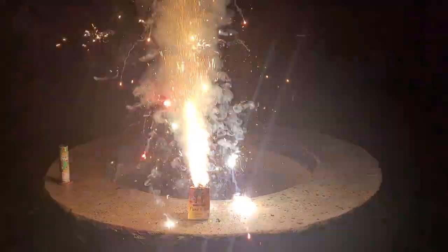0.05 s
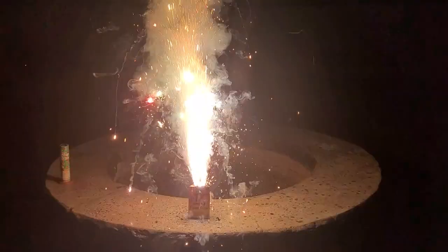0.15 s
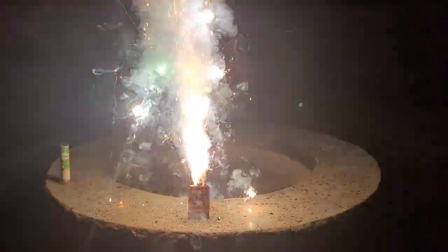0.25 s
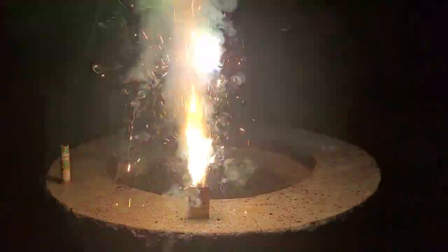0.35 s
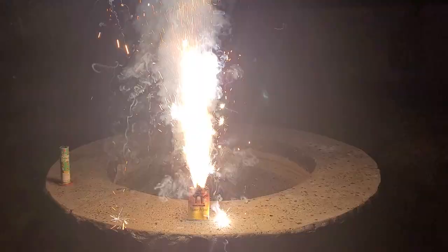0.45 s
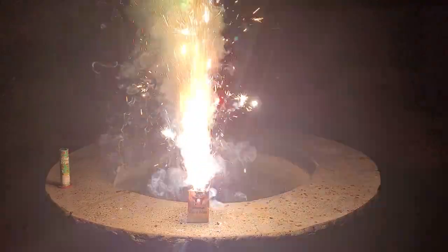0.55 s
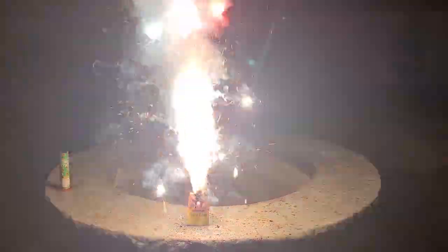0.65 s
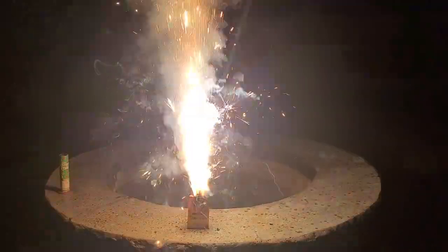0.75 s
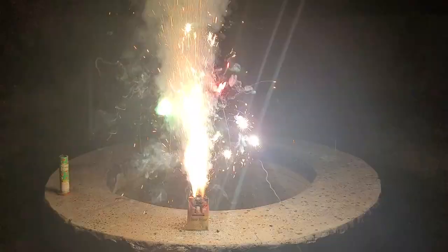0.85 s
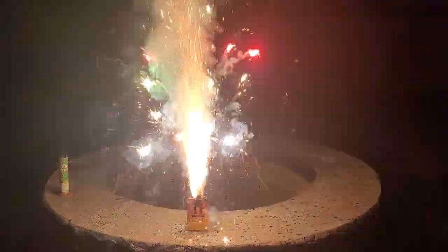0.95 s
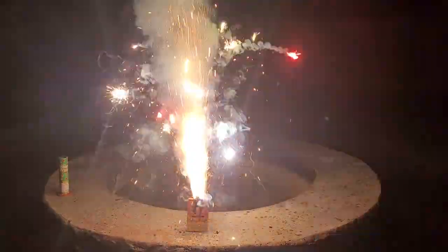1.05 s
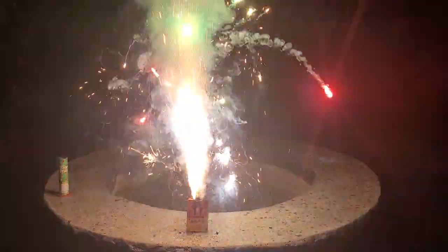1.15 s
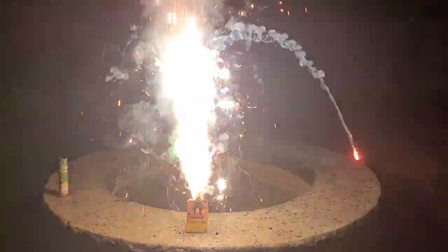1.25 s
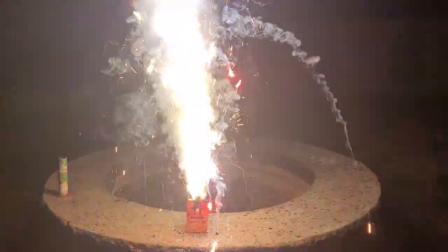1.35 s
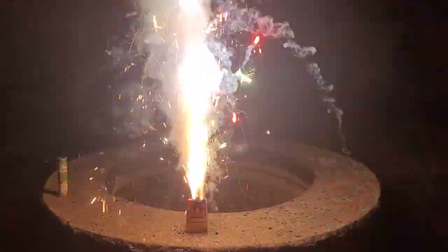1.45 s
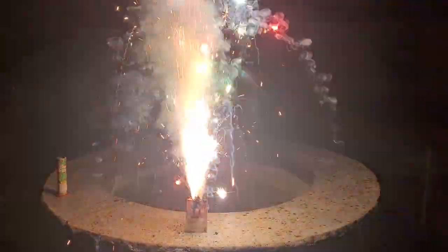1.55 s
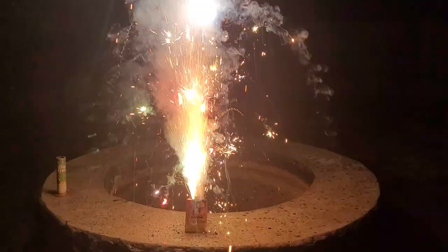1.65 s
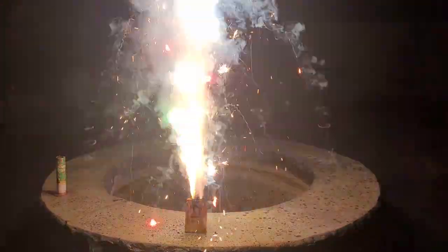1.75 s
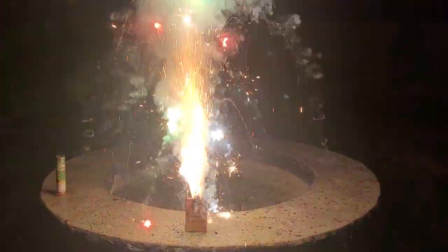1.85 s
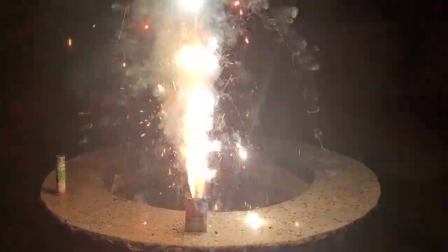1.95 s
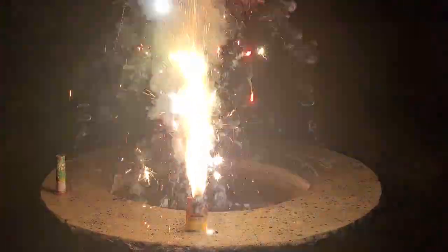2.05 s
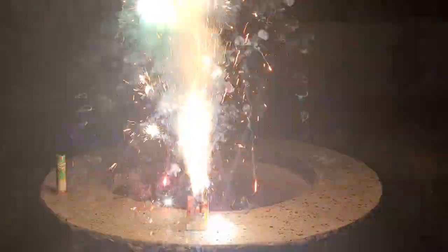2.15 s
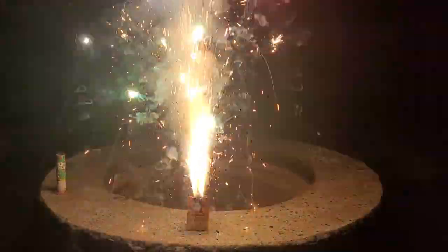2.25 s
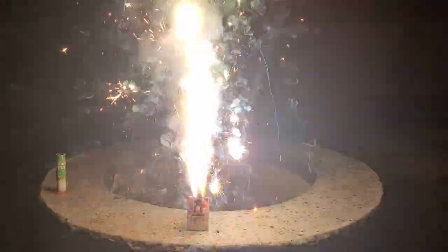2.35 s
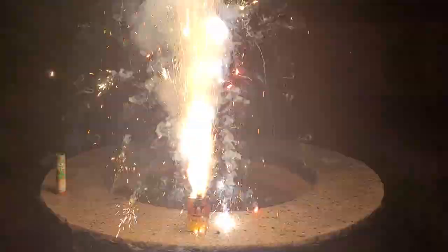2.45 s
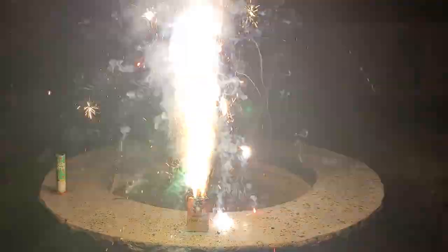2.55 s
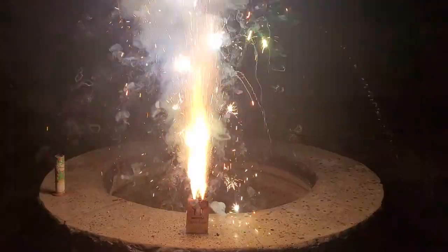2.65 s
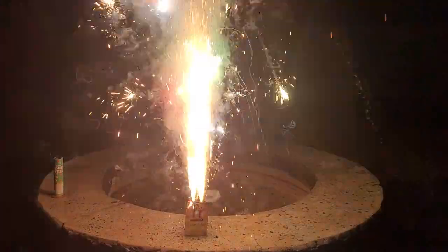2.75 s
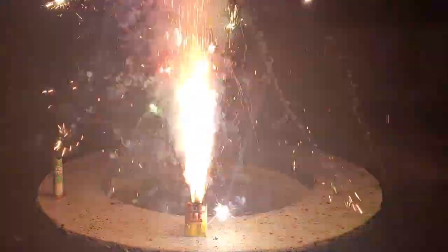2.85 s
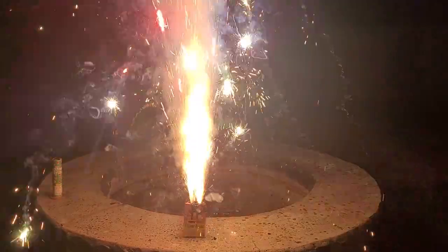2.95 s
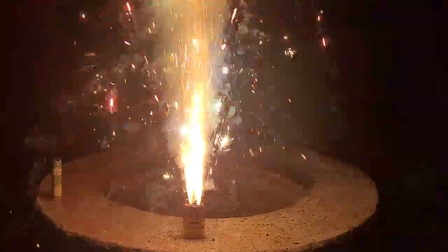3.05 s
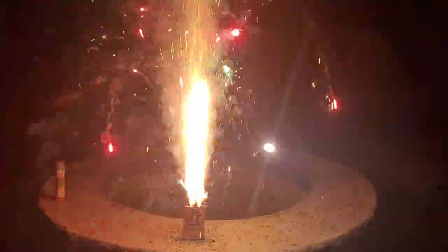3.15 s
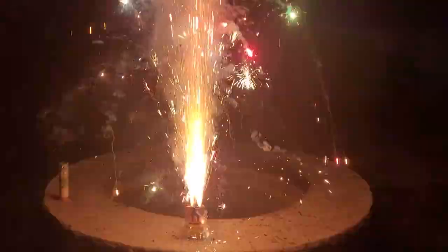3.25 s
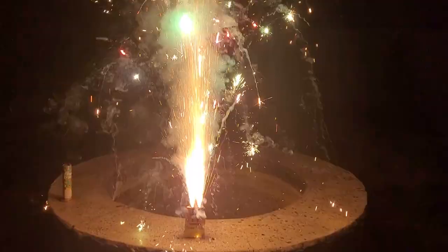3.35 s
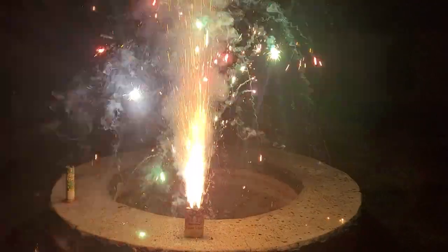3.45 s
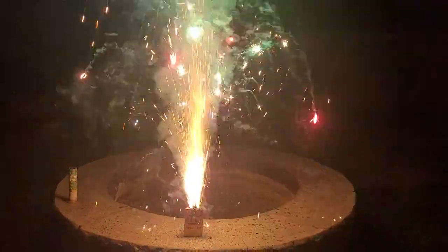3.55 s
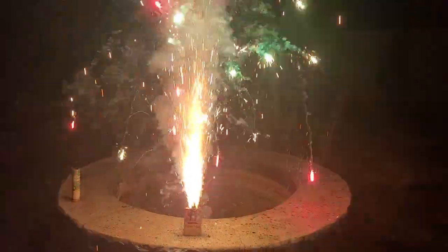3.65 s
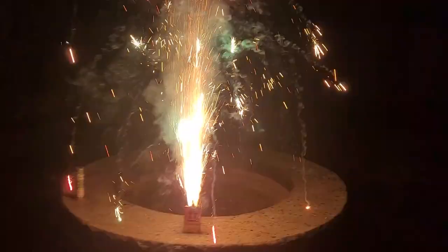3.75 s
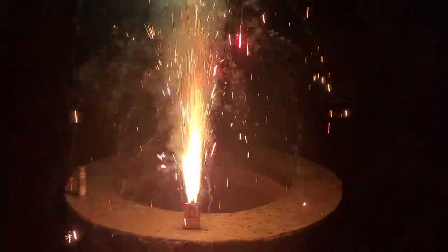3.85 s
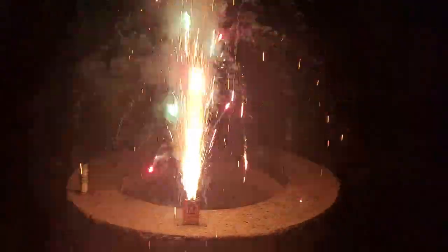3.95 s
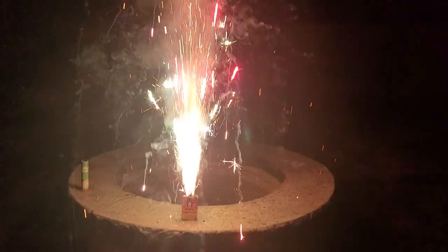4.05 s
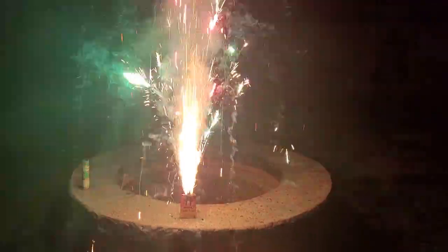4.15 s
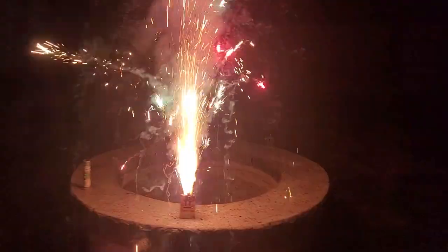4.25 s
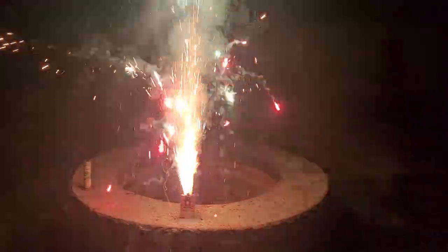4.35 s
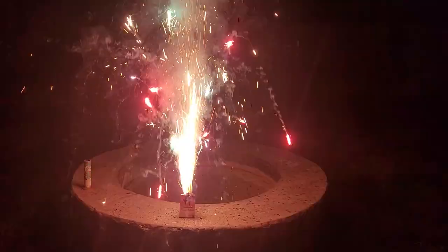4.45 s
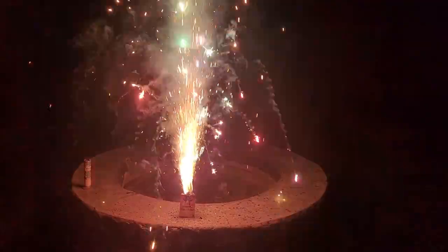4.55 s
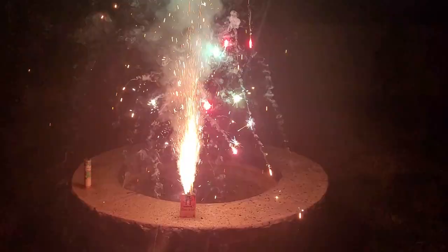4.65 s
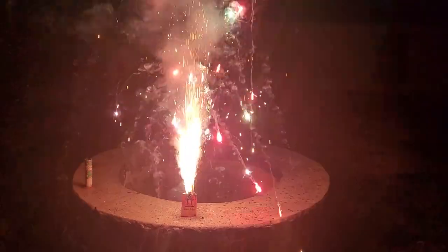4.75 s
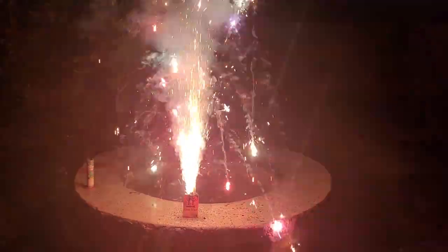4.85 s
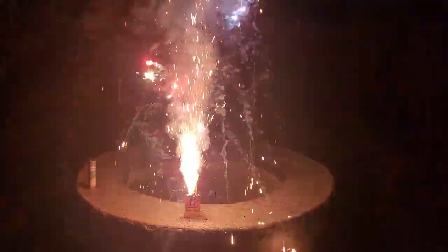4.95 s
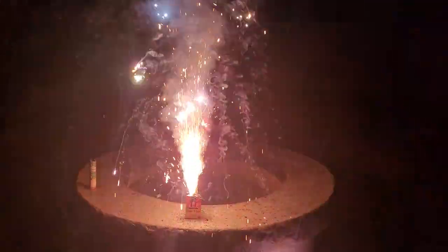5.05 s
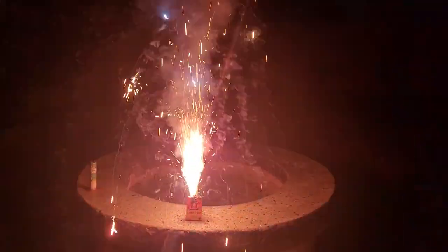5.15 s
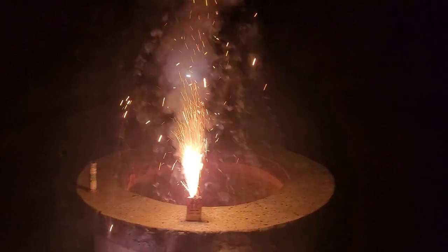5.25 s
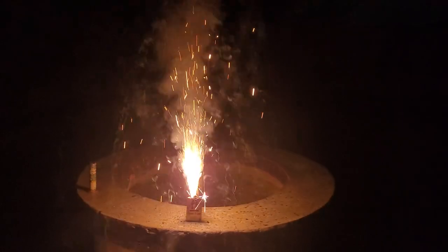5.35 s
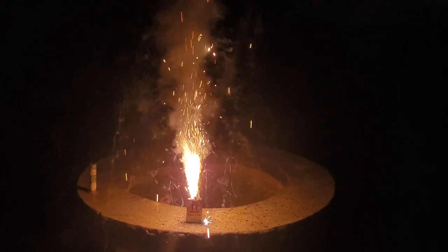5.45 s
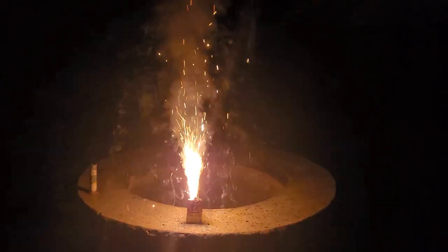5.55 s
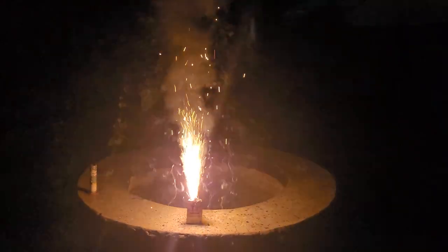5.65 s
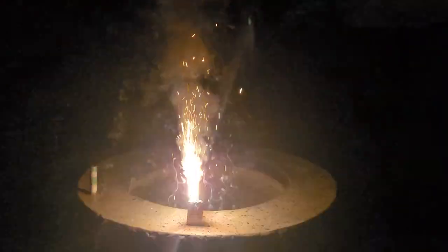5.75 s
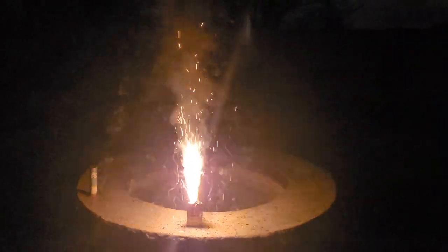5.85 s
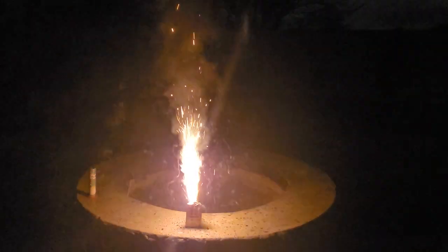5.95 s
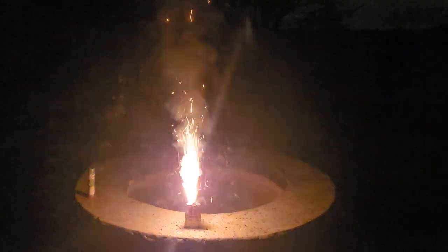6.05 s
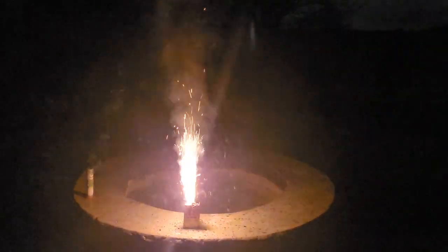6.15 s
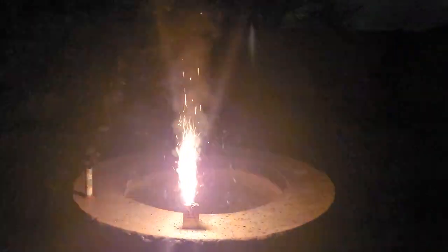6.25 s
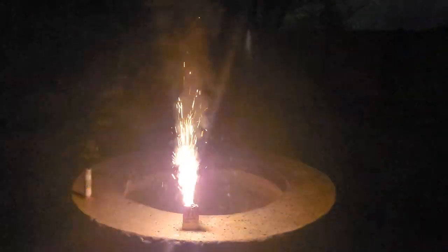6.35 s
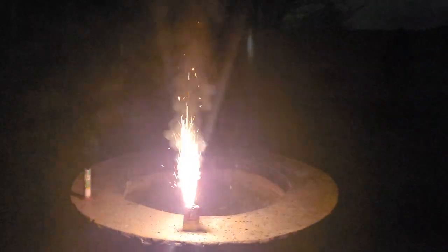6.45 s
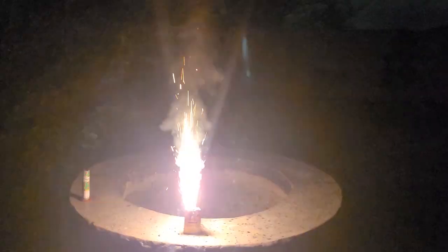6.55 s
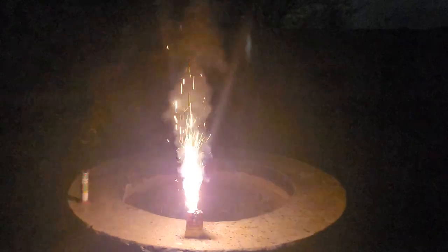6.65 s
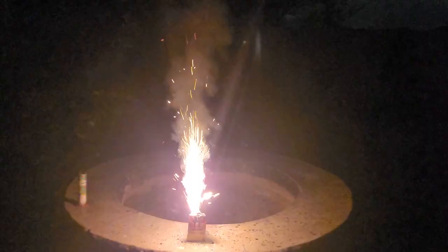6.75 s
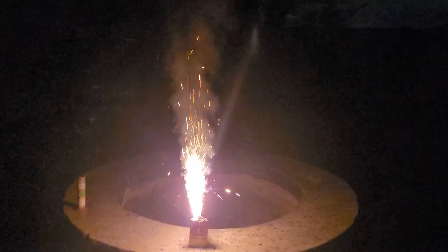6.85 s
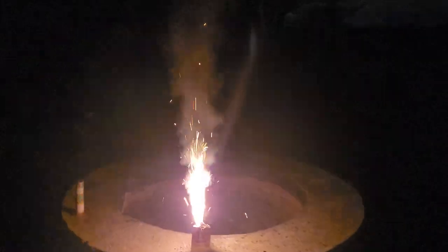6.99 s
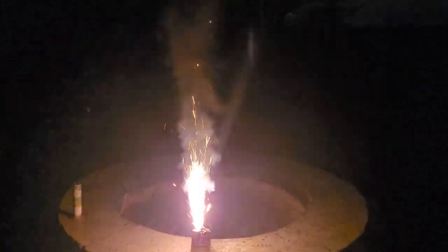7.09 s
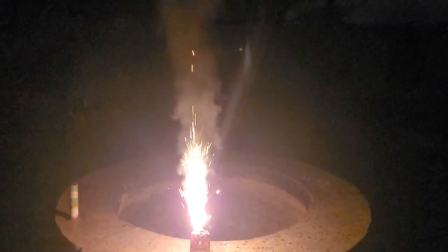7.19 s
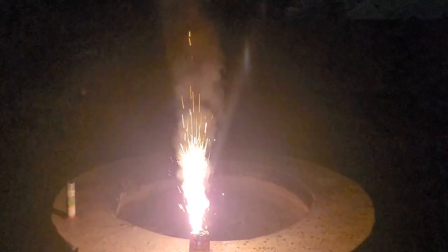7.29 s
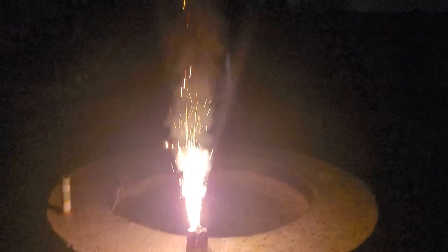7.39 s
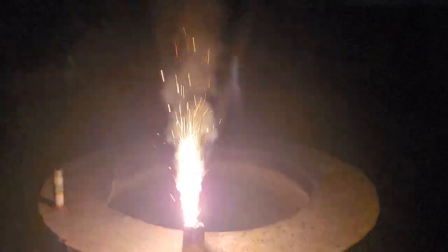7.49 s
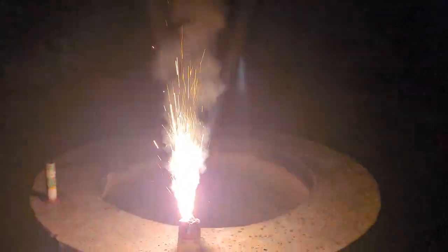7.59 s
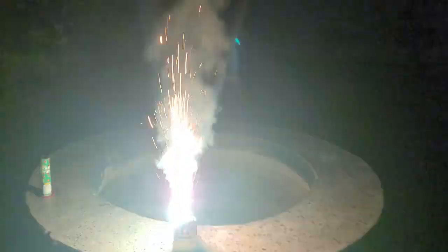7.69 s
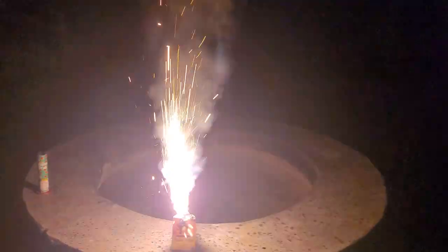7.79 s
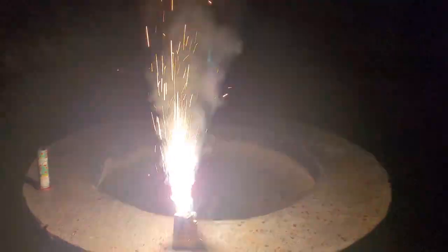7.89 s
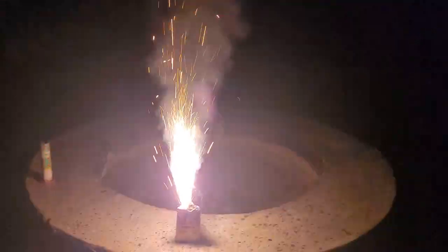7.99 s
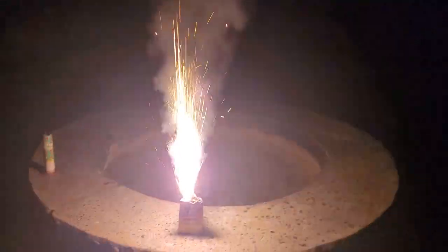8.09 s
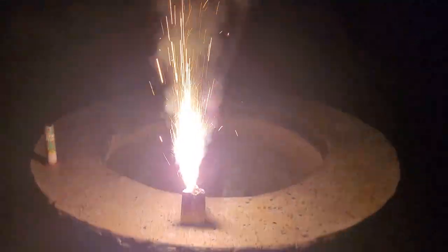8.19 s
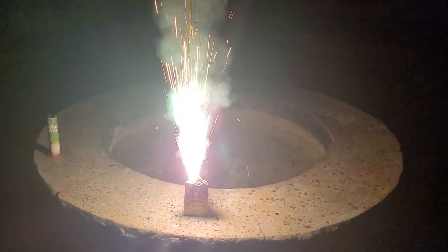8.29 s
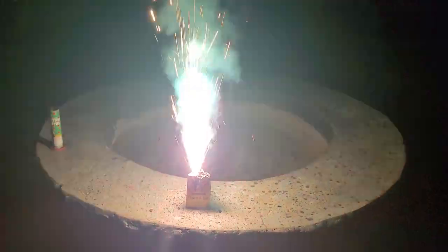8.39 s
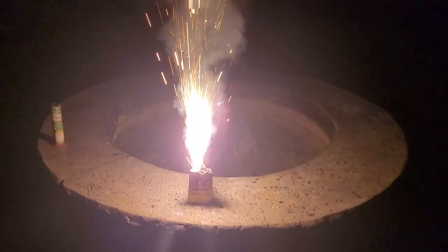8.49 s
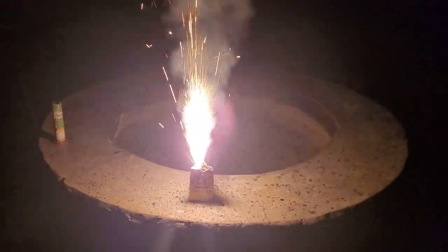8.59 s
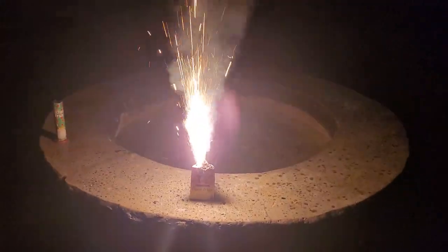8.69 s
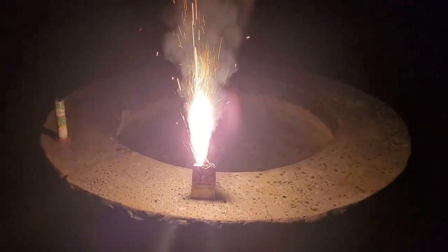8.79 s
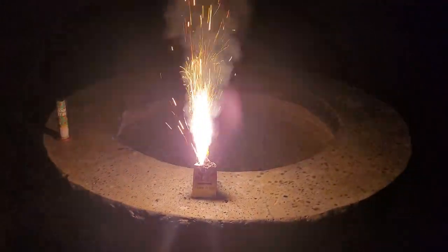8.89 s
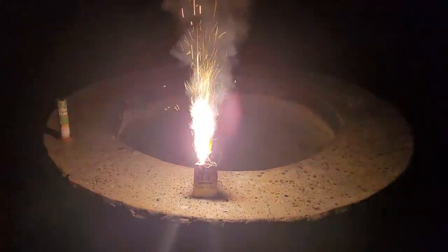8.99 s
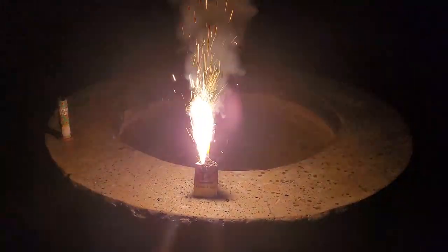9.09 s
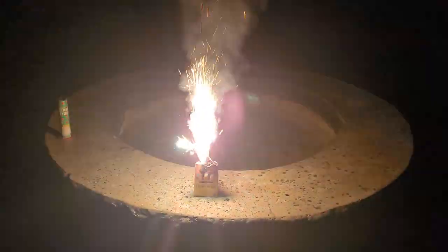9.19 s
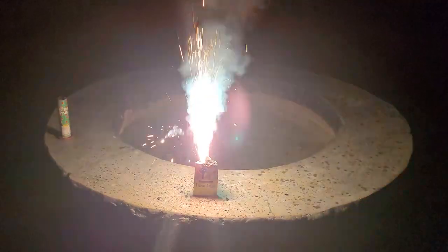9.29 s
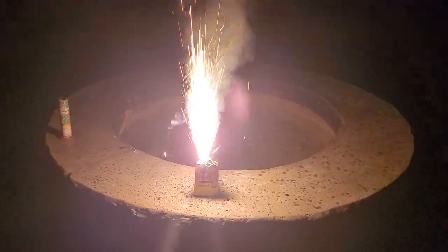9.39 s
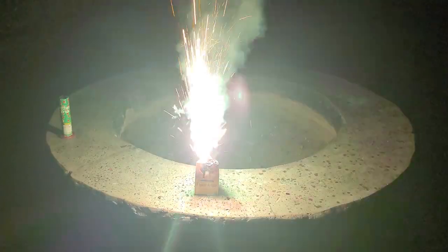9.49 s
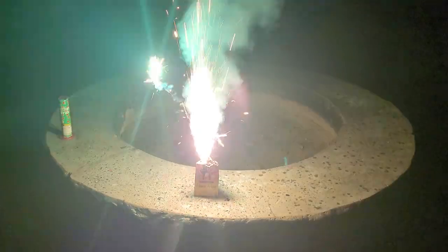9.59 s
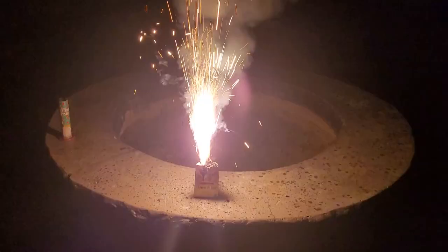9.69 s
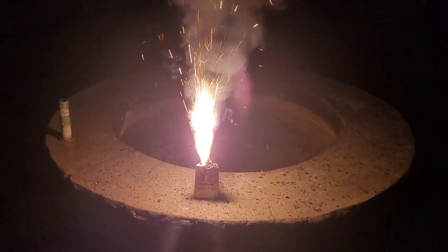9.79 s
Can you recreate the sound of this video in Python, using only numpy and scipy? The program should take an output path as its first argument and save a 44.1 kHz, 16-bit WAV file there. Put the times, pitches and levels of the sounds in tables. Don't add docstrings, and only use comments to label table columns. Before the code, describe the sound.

Gusty rushing gas and thick, fizzing crackle from a firework fountain, loud at first, then dropping away to a sputtering hiss with sparse ticks.

```python
import sys
import numpy as np
from scipy import signal
from scipy.fft import rfft, irfft, next_fast_len
from scipy.io import wavfile

SR = 44100
rng = np.random.default_rng(int(sys.argv[2]) if len(sys.argv) > 2 else 0)


def gain_from_db(level_db):
    decades = np.asarray(level_db, float) / 20
    return 10 ** decades


def generate_wav(sig):
    pcm = np.round(np.clip(np.atleast_2d(sig).T, -1, 1) * 32767).astype(np.int16)
    wavfile.write(sys.argv[1], SR, pcm)


N = 433491
TAPS = 4096
PORT_DELAY = 64


def evened(x):
    return x / np.sqrt(np.mean(x ** 2) + 1e-20)


def read(points, hz):
    f, value = np.transpose(points)
    return np.interp(np.log(hz + 1), np.log(f + 1), value)


def curve(rows, column):
    return np.interp(np.arange(N) / SR, np.transpose(rows)[0], np.transpose(rows)[column])


def surges(rows):
    t = np.arange(0, N + 64, 64) / SR
    centre, db, half = np.transpose(rows)[:, :, None]
    total_db = (db * np.exp(-((t - centre) / half) ** 2)).sum(axis=0)
    return np.interp(np.arange(N) / SR, t, total_db)


def gusts(low_hz, high_hz):
    size = N // 16 + 2
    hz = np.fft.rfftfreq(size, 16 / SR)
    shape = hz / (hz + low_hz) / np.sqrt(hz + low_hz) / (1 + (hz / high_hz) ** 2)
    slow = irfft(rfft(rng.standard_normal(size)) * shape, size)
    return evened(np.interp(np.arange(N) / 16, np.arange(len(slow)), slow))


# f/Hz, lead/rad
PORT_LEAD = [(0, 0), (1030, -.3), (2070, .6), (3100, 2.6), (3500, 4.7), (4800, 6.3), (5900, 6.7), (7450, 9),
             (7950, 6.9), (8900, 6.7), (11250, 9.4), (11900, 11.9), (13000, 13.3), (15600, 15.8)]


def ports(left, right, low_cut_hz, lag_s=0.):
    hz = np.fft.rfftfreq(TAPS, 1 / SR)
    gain = gain_from_db(np.maximum(read(left, hz), -100)) / np.sqrt(1 + (low_cut_hz / (hz + 1)) ** 4)
    log_gain = np.log(np.r_[gain, gain[-2:0:-1]])
    phase = signal.hilbert(log_gain).imag[:len(hz)]
    causal = gain * np.exp(-1j * phase - 2j * np.pi * hz * PORT_DELAY / SR)
    turn = np.exp(-1j * read(PORT_LEAD, hz) - 2j * np.pi * hz * lag_s)
    return np.array([causal, causal * turn * gain_from_db(read(right, hz) - read(left, hz))])


def heard(x, response):
    taps = irfft(np.atleast_2d(response), TAPS)
    return signal.oaconvolve(np.atleast_2d(x), taps, axes=1)[:, PORT_DELAY:N + PORT_DELAY]


def shaped(x, bands):
    size = next_fast_len(N)
    hz, z, out = np.fft.rfftfreq(size, 1 / SR), rfft(x, size), 0
    for from_hz, to_hz, low_hz, high_hz, level in bands:
        part = 1 / (1 + (from_hz / (hz + 1)) ** 8) - 1 / (1 + (to_hz / (hz + 1)) ** 8)
        inside = (hz > low_hz) & (hz < high_hz)
        core = np.sqrt(2 * np.sum(abs(z.mean(0)[inside]) ** 2) / size / N)
        out = out + irfft(z * part, size)[:, :N] * level / core
    return out


def dip(x, hz, width_hz, depth):
    turn, r = np.exp(2j * np.pi * np.cumsum(hz) / SR), np.exp(-np.pi * width_hz / SR)
    return x - depth * 2 * (turn * signal.lfilter([1 - r], [1, -r], x / turn)).real


# t/s, ground delay/ms, ground share, rim delay/ms, rim share
STONE_ECHOES = [
    (0, 2.37, 0.34, 3.73, -0.035),
    (3, 2.32, 0.34, 3.38, -0.092),
    (3.6, 2.38, 0.52, 2.4, -.2),
    (4.2, 2.1, 0.72, 2.55, -0.39),
    (6, 2.14, 0.45, 2.7, -0.13),
    (6.7, 2.2, 0.38, 2.7, -0.15),
    (7.1, 2.36, 0.34, 2.08, 0.19),
    (7.5, 2.2, 0.18, 2.53, 0.22),
    (8, 2.08, 0.16, 2.7, 0.13),
    (9.83, 2.06, 0.3, 3.1, 0.11),
]


def echoed(x, earlier_ms):
    n = np.arange(N)
    dull = signal.lfilter(*signal.butter(1, [250, 5000], "bandpass", fs=SR), x)
    ground = np.interp(n - (curve(STONE_ECHOES, 1) - earlier_ms) * SR / 1000, n, dull)
    rim = np.interp(n - (curve(STONE_ECHOES, 3) - earlier_ms) * SR / 1000, n, dull)
    return x + curve(STONE_ECHOES, 2) * ground + curve(STONE_ECHOES, 4) * rim


# t/s, level/dB, weight of coarse sparks/dB
SPARK_LOAD = [(0, -36.5, 0.5), (.25, -39, 0.5), (1.1, -38.5, -1.5), (2.2, -34.5, -1), (2.7, -37, 2.5),
              (3.4, -40, 4.5), (3.8, -40.5, -0.5), (4.6, -43.5, 0.5), (5.15, -47.5, -3), (5.5, -62, -4),
              (6, -73, 0), (9.83, -75, -2)]
# t/s, level/dB, half length/s
FLARES = [(0, 4, 0.034), (.13, 4.5, 0.032), (.53, 2, 0.11), (.71, 3, .04), (.94, 3.5, .05),
          (1.13, 3.5, 0.03), (1.31, 3.5, 0.072), (1.45, 3, 0.03), (1.62, 2, 0.052), (9.29, 3.5, 0.029),
          (2.16, 3, 0.036), (2.43, 2.5, 0.072), (2.62, 0.5, 0.034), (2.76, 4, 0.026), (2.96, 3, 0.11),
          (3.28, 2.5, 0.079), (3.89, -3.5, 0.086), (4.96, 1.5, 0.1), (5.125, 3, 0.02), (7.32, 7, .022),
          (6.81, 1.5, 0.06), (7.0, 2.5, .06), (7.23, 4.5, 0.058), (8.35, 5, 0.033), (8.43, 7, .025),
          (8.485, 1, 0.02), (9.2, 6.5, .028), (9.43, 5, .025), (9.53, 8, 0.04), (9.66, 6, 0.071)]


def cloud_db():
    load, flare = curve(SPARK_LOAD, 1), surges(FLARES)
    return load + curve(SPARK_LOAD, 2) + 0.78 * flare, load + flare


# t/s, roar level/dB
BURN = [(0, -30.5), (.3, -31.5), (1.1, -36), (1.8, -35.5), (2.35, -33), (2.9, -29), (3.45, -29.5),
        (3.85, -35.5), (4.55, -40.5), (5.12, -38), (5.5, -47.5), (6.1, -47), (6.75, -40), (7.1, -47.5),
        (7.75, -34), (8.7, -34), (9.0, -41.5), (9.83, -38.5)]
# t/s, level/dB, half length/s
PUFFS = [(.08, 3.5, 0.069), (.52, 1.5, 0.05), (.7, 3, 0.024), (.9, 1.5, 0.055), (1.31, 6, 0.1),
         (1.61, 4, .07), (1.95, 1.5, 0.07), (2.14, 2.5, 0.091), (2.5, 2, .08), (2.93, 0.5, .06),
         (3.37, 2.5, 0.057), (4.3, 3, 0.057), (4.84, 3.5, 0.15), (5.09, 2.5, .03), (5.97, 2.5, .04),
         (6.52, 1.5, 0.061), (6.62, 4, 0.024), (7.24, 3.5, 0.14), (7.38, 1.5, 0.042), (7.63, 3, 0.026),
         (8.05, -2.5, 0.029), (8.14, 4.5, 0.044), (8.24, 6.5, 0.02), (8.41, 3, 0.059), (8.68, 4.5, 0.016),
         (8.87, 4.5, 0.03), (9.09, 2, 0.064), (9.28, 6, 0.033), (9.47, 9.5, 0.12), (9.66, 8, 0.072)]
# t/s, gain
MOUTH_RING = [
    (0, 0),
    (5.1, 0.),
    (5.5, 1.5),
    (7.3, 0.99),
    (7.7, 0.17),
    (9.83, 0),
]
# f/Hz, level/dB per Hz
JET_LEFT = [(40, -1), (215, -10), (255, 2.5), (540, -7.5), (640, -10), (1900, -13.5), (2600, -21),
            (4200, -20.5), (5300, -18.5), (6200, -23.5), (7300, -18), (8600, -29), (10300, -23),
            (15600, -22.5)]
JET_RIGHT = [(40, 2), (215, -11.5), (255, 3.5), (540, -5.5), (640, -9.5), (1900, -6), (2600, -17),
             (3400, -35), (4800, -12.5), (6500, -12.5), (8600, -24), (10300, -17), (13000, -15.5),
             (15600, -14)]
# f/Hz, likeness 0-1
JET_LIKENESS = [(60, 0.94), (450, 1), (1200, 0.75), (2200, 0.93), (3400, 0.3), (4500, 0.98), (7300, 0.66),
                (7800, 0.4), (8600, 0.45), (11200, 0.8), (15000, 0.87)]
# t/s, first dip f/Hz, second dip f/Hz
HAND_DIPS = [
    (0, 7740, 10900),
    (5.5, 8150, 12100),
    (6.5, 7800, 11400),
    (7.5, 7900, 11400),
    (8.1, 8200, 11600),
    (8.5, 7950, 11600),
    (9.83, 7700, 10800),
]


def jet():
    flutter, spit = gusts(1.2, 46), gusts(3.9, 330)
    gas, stray = rng.standard_normal((2, N)) * gain_from_db(1.0 * flutter)
    hz = np.fft.rfftfreq(TAPS, 1 / SR)
    response = ports(JET_LEFT, JET_RIGHT, 49)
    same = np.clip(read(JET_LIKENESS, hz), 0, 1)
    mouth = 1 / (1 + ((hz - 5800) / 500) ** 2)

    left = heard(echoed(gas, 0.0049), response[0])
    left = left + curve(MOUTH_RING, 1) * heard(gas, response[0] * mouth)
    right = heard(echoed(gas, 0.15), response[1] * same)
    right = right + heard(stray, response[1] * np.sqrt(1 - same ** 2))
    right = dip(right[0], curve(HAND_DIPS, 1), 900, .6)
    right = dip(right, curve(HAND_DIPS, 2), 1000, .56)

    burn, puff, flare = curve(BURN, 1), surges(PUFFS), surges(FLARES)
    roar_db = burn + puff
    thrum_db = roar_db - 2.5 - 13.5 * curve(STONE_ECHOES, 2)
    hiss_db = -50.5 + 0.83 * (burn + 40) + 0.93 * puff + 0.26 * flare
    fizz_db = -46.5 + 0.44 * (burn + 40) + .15 * puff + flare
    stream_db = np.array(cloud_db()) - 2.5
    hiss, fizz = np.hypot(gain_from_db([hiss_db, fizz_db]), gain_from_db(stream_db))
    top_db = 2.3 * spit - 1.5 + .6 * flare + 0.16 * (burn + 40)
    return shaped(np.vstack([left, right]), [
        (0, 130.5, 46, 142, gain_from_db(roar_db - 13.0)),
        (130.0, 314, 51, 296, gain_from_db(thrum_db)),
        (327, 3290, 93, 4800, gain_from_db(roar_db)),
        (2550, 8740, 4080, 7600, hiss * gain_from_db(1.2 * spit)),
        (8470, 12600, 8100, 18000, fizz * gain_from_db(2.2 * spit)),
        (13800, 30000, 8100, 15400, fizz * gain_from_db(top_db))])


# f/Hz, level/dB per Hz
SPARK_LEFT = [(40, -21), (650, -21), (1900, -14.5), (2600, -8.5), (3500, -7.5), (4800, -10), (7300, -6.5),
              (8600, -14), (10300, -10.8), (13000, -11), (15500, -8.5)]
SPARK_RIGHT = [(40, -20.5), (650, -20), (1900, -7.5), (2600, -7.5), (3500, -19), (4800, -7), (7300, -3),
               (8600, -13), (10300, -14), (13000, -6.5), (15500, -3)]


def cloud():
    chance = 9000 * gain_from_db(2.2 * gusts(8, 150)) / SR
    fizz = gain_from_db(2.11 * rng.exponential(1, N)) * (rng.random(N) < chance) * rng.choice([-1, 1], N)
    snap_db = 13 + 2.5 * np.minimum(rng.exponential(1, N), 2.5)
    snaps = -gain_from_db(snap_db) * (rng.random(N) < .02 * chance)
    side, out = rng.integers(0, 8, N), 0
    for k, place in enumerate(np.linspace(-1, 1, num=8)):
        tilt = gain_from_db([[-3 * place], [3 * place]])
        response = ports(SPARK_LEFT, SPARK_RIGHT, 1670, 6e-5 * place) * tilt
        out = out + heard((fizz + snaps) * (side == k), response)
    hiss_db, top_db = cloud_db()
    return shaped(out, [(0, 7830, 3900, 7800, gain_from_db(hiss_db)),
                        (9300, 33000, 11640, 13660, gain_from_db(top_db))])


def night():
    a, b = rng.standard_normal((2, N))
    band = signal.butter(2, [45, 160], "bandpass", fs=SR, output="sos")
    return gain_from_db(-61.5) * evened(signal.sosfilt(band, [a + 0.37 * b, a - 0.28 * b]))


POP_RING_HZ = 13700
# t/s, peak level/dB, left-right/dB, ring f/Hz
CRACKS = [(0.167, -1, -13, 13700), (0.5351, -6.5, -4, 13100), (0.5471, -3, -2, 14900),
          (0.8434, -4, -5, 14700), (0.9842, -7, -10, 6500), (1.1244, -8, 0, 13400), (1.188, -7, -6, 9950),
          (1.233, -8, -10, 9500), (1.5558, -3, 0, 15000), (1.5685, -4, -16, 13400), (1.6585, -6, -5, 13200),
          (1.8028, -6, -3, 15100), (1.899, -2, -12, 13700), (1.9322, -2, -8, 13900), (2.394, -5, -3, 14200),
          (2.6465, 0, -5, 14670), (2.783, -3, -8, 5940), (3.2524, -.5, -15, 6300),
          (3.2836, -3.5, -4, 13000), (3.7938, -6, -5, 14900), (3.8261, -5, -2, 14900),
          (4.2485, -11, -9, 13000), (4.7746, -14, -4, 10600), (4.7768, -3, -5, 14560),
          (4.8576, -8, -7, 13800), (5.0917, -13, 1, 4650), (5.094, -14, 7, 7700), (5.0978, -14, -6, 2010),
          (5.87, -13.5, -4, 5700), (6.7841, -26, -6, 5930)]
# t/s, peak level/dB, left-right/dB
STRAYS = [(4.428, -11, -9), (5.0046, -10, -15), (5.088, -9, -3), (5.126, -12, -2), (5.3019, -16, -8),
          (5.3588, -22, -7), (5.4227, -20, -3), (5.4506, -21, -4), (5.6894, -23, -9), (5.9817, -29, -7),
          (6.471, -31, -6), (6.5868, -25, -6), (6.8876, -17, -10), (6.9924, -17, -13), (7.0649, -20, -8),
          (7.6268, -20, -8), (8.4263, -20, -6), (8.4763, -10.5, -5), (8.9291, -26, -8), (9.0935, -20, -9),
          (9.116, -17, -8), (9.6573, -16, -9)]


def bursts():
    when, size, side, ring = rng.random(size=(34, 4)).T
    s = when * 3.6
    level_db = curve(SPARK_LOAD, 1)[(s * SR).astype(int)] + 21.5 + 19 * (size - .5)
    pan_db = 2 + 11 * (side - .5)
    ring_hz = POP_RING_HZ * np.where(ring < .2, .45, .9 + .17 * ring)
    pops = np.transpose([s, level_db, pan_db, ring_hz])
    return CRACKS + [(*row, POP_RING_HZ) for row in STRAYS] + list(pops)


def cracks():
    out, t = np.zeros((2, N + TAPS)), np.arange(400) / SR
    response = ports(SPARK_LEFT, SPARK_RIGHT, 1200, -2.3e-5)
    ring_cycles, sizzle_db, sizzle_s = 2.25, -12.5, 0.004
    rows = bursts()
    for (s, peak_db, pan_db, ring_hz), grit in zip(rows, rng.standard_normal((len(rows), len(t)))):
        decay = np.exp(-t * ring_hz / ring_cycles)
        decay = decay + gain_from_db(sizzle_db) * grit * np.exp(-t / sizzle_s)
        burst = 0.36 * np.sin(2 * np.pi * ring_hz * t) * decay
        burst = burst + 0.33 * np.sqrt(POP_RING_HZ / ring_hz) * (t == 0)
        click = irfft(response * rfft(burst, TAPS), TAPS)
        click = click / np.linalg.norm(click, axis=1, keepdims=True)
        click = click * gain_from_db([[pan_db / 2], [-pan_db / 2]])
        click = click + .18 * np.roll(click, round(.0025 * SR), axis=1)
        at = max(round(s * SR) - 72, 0)
        out[:, at:at + TAPS] += gain_from_db(peak_db - 3) * click / abs(click).max()
    return out[:, :N]


def scene():
    return jet() + cloud() + night() + cracks()


def top_cut(x):
    return signal.sosfilt(signal.butter(12, 16300, fs=SR, output="sos"), x)


def record(dry):
    heavy = signal.sosfilt(signal.butter(4, 48, "highpass", fs=SR, output="sos"), dry)
    edge = signal.firwin(511, 15750, window=("kaiser", 8), fs=SR)
    limited = signal.oaconvolve(heavy, edge[None], "same", axes=1)
    return top_cut(limited)


dry = scene()
out = record(dry)
generate_wav(out)
```